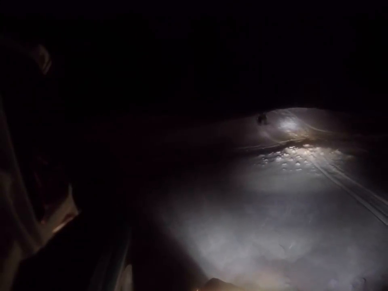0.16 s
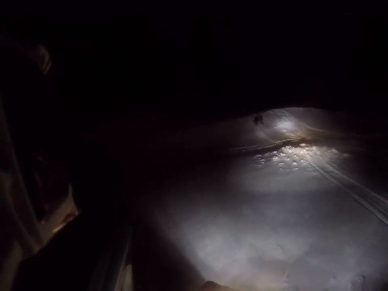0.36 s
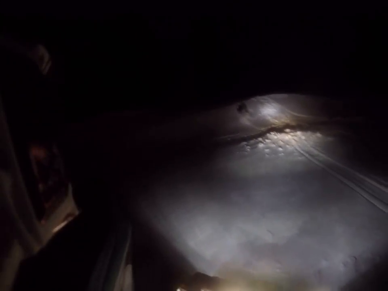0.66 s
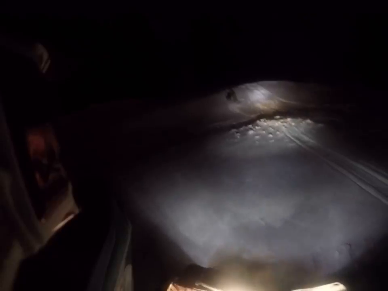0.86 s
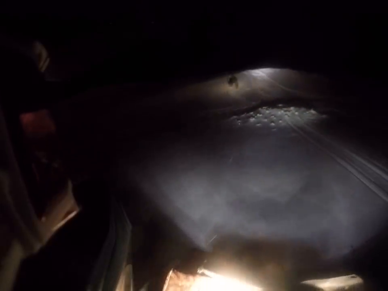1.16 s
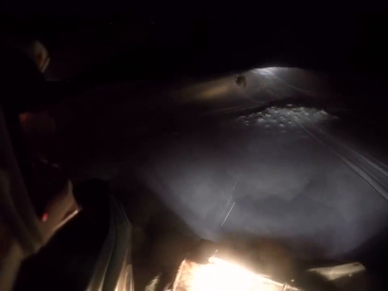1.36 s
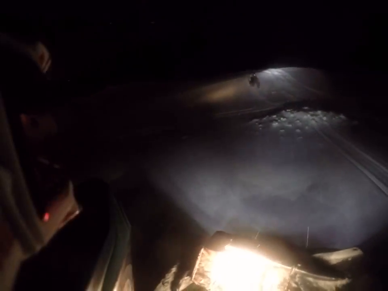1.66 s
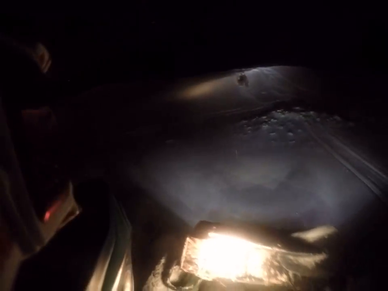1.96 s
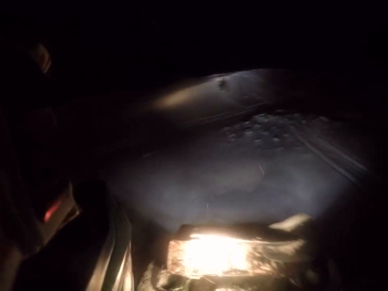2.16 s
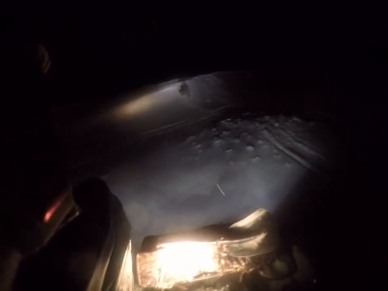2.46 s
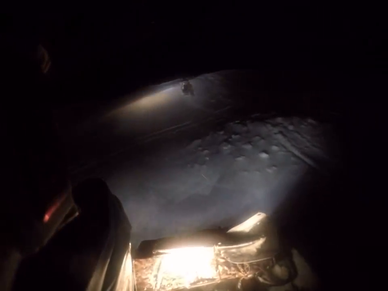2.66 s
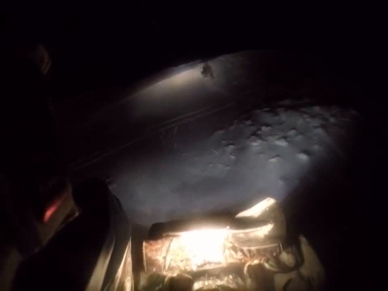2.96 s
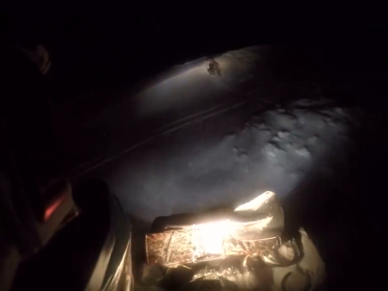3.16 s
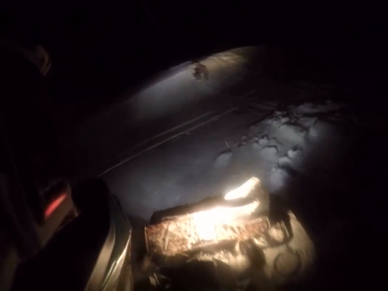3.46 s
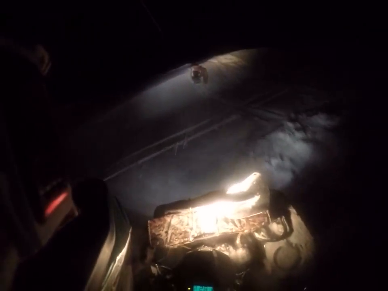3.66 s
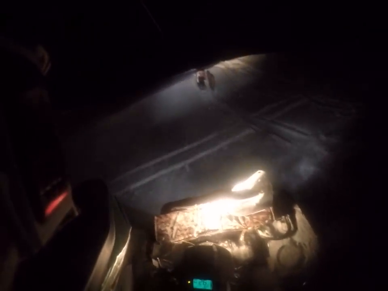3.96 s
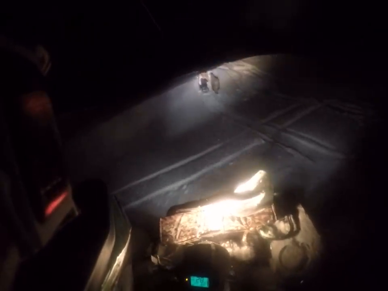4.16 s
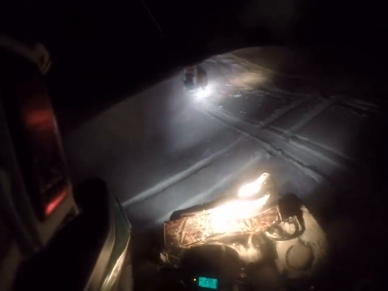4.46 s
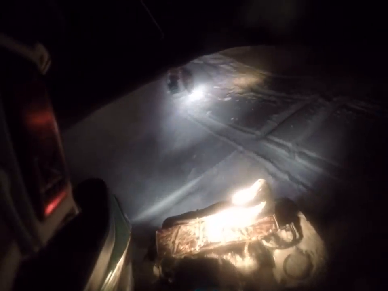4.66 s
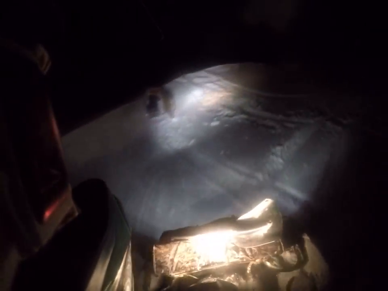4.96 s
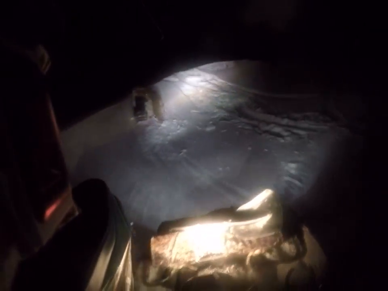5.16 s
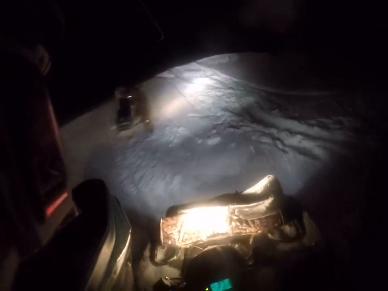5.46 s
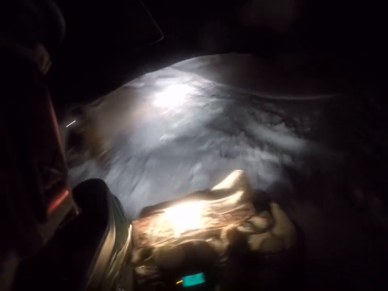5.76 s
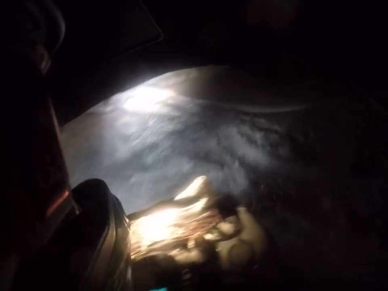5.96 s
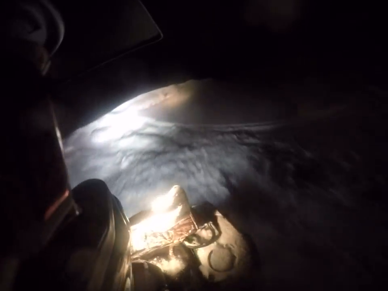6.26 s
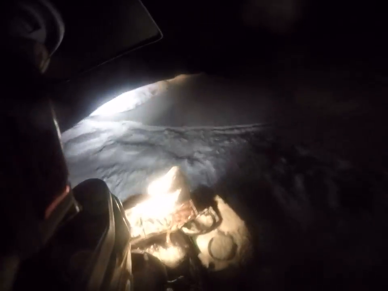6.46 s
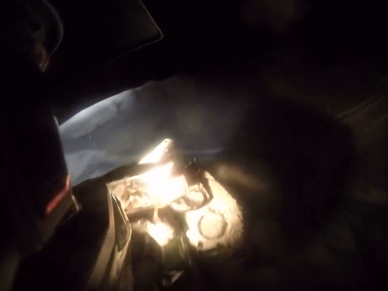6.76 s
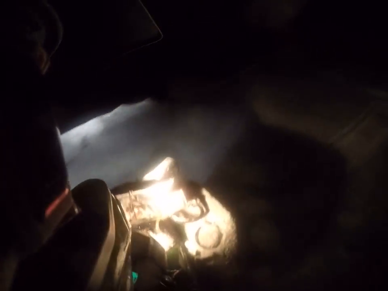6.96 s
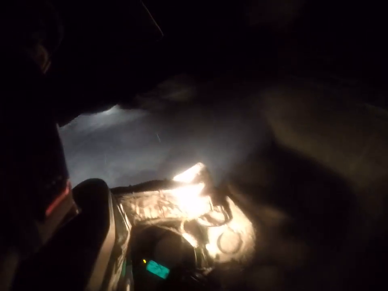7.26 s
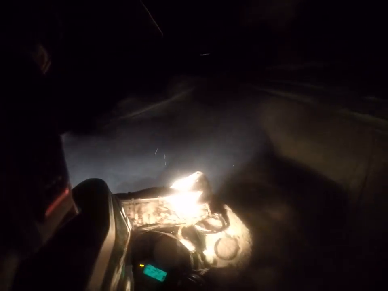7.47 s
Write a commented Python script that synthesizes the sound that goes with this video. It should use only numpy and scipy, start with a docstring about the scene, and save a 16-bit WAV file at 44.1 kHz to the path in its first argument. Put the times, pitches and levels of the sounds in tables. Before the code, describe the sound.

Close from the rider's seat, the thumping engine of a tracked all-terrain vehicle rises from idle in two nudges of throttle. After a sharp click and a very hard, booming knock on the bodywork, it revs higher and keeps pulling across open snow. The chassis rumbles over bumps, gears whine in patches, and light knocks, ice ticks and a faint brushing of snow come through the engine.

```python
"""Tracked all-terrain vehicle pulling away through snow.

Heard from the seat: idle, two nudges of throttle, then a held pull. Each engine cycle thumps the
exhaust, gulps air and rattles the casing. Gears whine, the chassis rumbles, the tracks brush snow
and fling ice. Loose fittings tick, and one hard knock sets the chassis booming."""
import sys
import numpy as np
from scipy import signal
from scipy.fft import rfft, irfft, next_fast_len
from scipy.io import wavfile
from scipy.ndimage import uniform_filter1d

SR = 44100
rng = np.random.default_rng(int(sys.argv[2]) if len(sys.argv) > 2 else 0)


def dump(signal):
    """Clip the signal to [-1, 1] and save it as 16-bit WAV at the path in sys.argv[1]."""
    limited = np.clip(np.atleast_2d(signal).T, -1, 1)
    pcm = np.round(limited * 32767).astype(np.int16)
    wavfile.write(sys.argv[1], SR, pcm)


N = 336042
TIME_S = np.arange(N) / SR

# Engine speed. Each row: time in seconds, cycle rate in Hz.
CYCLE_RATE = [(0, 13.6), (0.42, 14.3), (0.67, 20.8), (0.8, 23), (0.93, 26.7), (1, 28.4), (1.06, 29.3),
              (1.17, 30.1), (1.26, 29.2), (1.41, 24.6), (1.53, 23.2), (1.65, 25.8), (1.82, 29),
              (1.95, 30.3), (2.03, 30.7), (2.38, 30.9), (2.67, 31.5), (2.9, 33.4), (3.03, 36.3),
              (3.14, 39.9), (3.24, 42.6), (3.35, 44.8), (3.42, 44.8), (3.66, 42.7), (3.75, 43),
              (4.04, 45.5), (4.27, 42.7), (4.57, 41.3), (4.87, 47.3), (5.02, 49.5), (5.13, 50.4),
              (5.29, 50), (5.48, 48), (5.94, 46.4), (6.19, 45), (6.34, 45.9), (6.79, 43.7), (7.07, 46.7),
              (7.33, 47.7), (7.62, 46.3)]
# Throttle. Each row: time in seconds, opening from 0 to 1.
THROTTLE = [(0.38, 0.03), (0.45, 0.93), (0.85, .35), (0.95, 1), (1.24, 0.97), (1.35, 0.06), (1.58, 0.66),
            (1.72, 0.8), (2.1, 0.71), (2.8, 0.71), (3, 0.9), (3.22, 0.94), (3.37, 0.8), (3.53, 0.4),
            (3.69, 0.65), (4.05, 0.87), (4.16, 0.38), (4.54, 0.44), (4.66, 0.93), (4.88, 0.99), (5.3, 0.82),
            (5.86, 0.71), (6.27, 0.92), (7.1, 0.91), (7.62, 0.91)]
# Breathing against speed. Each row: cycle rate in Hz, then exhaust, burble and inlet gains in dB.
BREATHING = [(14, -12, -61.5, -76), (21.5, -14, -52, -79), (26, -0.5, -47.5, -63), (30.2, -0.5, -50, -56),
             (33.2, 1.5, -57, -50.5), (41.6, 0, -49, -47), (44.7, 0, -48.5, -58), (51.4, 3, -45, -59)]
# Low-speed exhaust spectrum. Each row: frequency in Hz, relative level of an order there in dB.
EXHAUST_SLOW = [(40, -43), (62, -35.5), (78, -35), (92, -41.5), (125, -45), (155, -48.5), (180, -45.5),
                (215, -51.5), (255, -51), (300, -49), (355, -51.5), (400, -63.5), (650, -64)]
# High-speed exhaust spectrum, silencer peaks near 300 and 450 Hz. Columns as above.
EXHAUST_FAST = [(85, -32), (135, -36), (180, -38.5), (200, -40), (228, -47), (260, -52), (302, -42),
                (322, -45.5), (350, -57), (385, -54.5), (415, -53), (452, -46.5), (490, -57), (600, -59.5),
                (680, -61), (760, -61), (1300, -56)]
# A wider throttle shortens the exhaust pulse. Each row: opening from 0 to 1, first notched order.
PULSE_NOTCH = [(0.7, 3.05), (0.88, 3.7), (0.97, 4.15)]
# Air box resonances. Each row: frequency in Hz, width in Hz.
AIRBOX_MODES = [(795, 66), (990, 33)]
# Air box ringing. Each row: time in seconds, lower mode level in dB, upper mode level in dB.
AIRBOX_LEVELS = [(0.6, -73, -77), (0.95, -56, -67), (1.18, -54, -66), (1.35, -62, -56), (1.5, -70, -71),
                 (1.65, -51, -56), (1.87, -50, -53.5), (2.2, -59, -52), (2.6, -58, -56), (2.95, -53.5, -68),
                 (3.27, -44, -50), (3.6, -54, -55), (3.85, -49.5, -49), (4.4, -50.5, -58),
                 (4.9, -47.5, -58), (5.6, -52.5, -50), (6.1, -50.5, -63), (6.9, -49, -51), (7.3, -60, -51)]
# Inlet hiss. Each row: frequency in Hz, relative level in dB.
INLET_SPECTRUM = [(200, -55), (500, -3.5), (700, -8.5), (1050, 7), (1400, -8.5), (2000, -33), (4000, -44)]
# Casing clatter. Each row: time in seconds, level in dB.
CLATTER_LEVEL = [(0.0, -49.5), (0.59, -50.5), (0.98, -43), (1.38, -42.5), (2.27, -40), (2.47, -44.5),
                 (2.8, -45), (3.3, -36), (3.87, -35.5), (4.07, -33), (4.6, -36.5), (4.9, -31.5),
                 (5.29, -34), (7.32, -32.5), (7.62, -33.5)]
# Broad casing response. Each row: frequency in Hz, relative level in dB.
CASING_SPECTRUM = [(200, -45.5), (420, -5), (650, -11.5), (1200, -9.5), (1700, -2), (2400, -6.5),
                   (3600, -15.5), (6000, -23), (7000, -28), (8600, -30), (9800, -35.5), (12000, -36.5),
                   (15500, -57)]
# Casing resonances. Each row: frequency in Hz, width in Hz, boost in dB.
CASING_MODES = [(1480, 120, 4), (1900, 280, 8.5), (2150, 120, 3), (2930, 400, 6.5), (4560, 330, 4),
                (5450, 320, 4), (6150, 350, 4), (7740, 500, 7.5)]
# Added at low speed, narrowing the casing's ring. Each row: frequency in Hz, width in Hz, gain in dB.
CASING_SLOW = [(1540, 180, -5), (2150, 330, 1.5), (2700, 200, -2)]
# Cam gear whine. Each row: time in seconds, base level in dB.
CAM_LEVEL = [(2.9, -68), (3.02, -44), (3.09, -55), (3.17, -43.5), (3.26, -42), (3.4, -50), (3.7, -48),
             (4.05, -53), (4.27, -43), (4.53, -41), (4.66, -42), (4.85, -34), (4.97, -50), (5.33, -51),
             (5.5, -39), (5.9, -44), (6.2, -40), (6.45, -41), (6.6, -52), (6.87, -54), (7.08, -35),
             (7.3, -34), (7.62, -40)]
# Frame judder as the clutch grabs. Each row: centre in seconds, half length in seconds, level in dB.
JUDDERS = [(0.115, 0.081, -34), (0.738, 0.053, -34), (1.127, 0.23, -27), (1.663, 0.023, -30),
           (2.1, 0.33, -31), (2.787, 0.089, -29), (3.023, 0.12, -22.5)]
# Trail bumps. Each row: centre in seconds, level in dB.
TRAIL_BUMPS = [(3.52, -33), (4.23, -25.5), (4.43, -29), (4.73, -28), (5.049, -30),
               (5.3, -34), (6.17, -33), (6.47, -28.5), (6.88, -40), (7.18, -29)]
# Chassis rumble. Each row: frequency in Hz, relative level in dB.
RUMBLE_SPECTRUM = [(12, -25), (24, -6), (34, 0), (46, -5), (60, -13), (100, -26), (200, -37), (400, -46),
                   (900, -65)]
# Blows on the bodywork. Each row: start in seconds, peak in dB, centre in Hz, spread in octaves,
# rattle gain in dB.
KNOCKS = [(0.658, -38, 1900, 0.36, -29), (0.88, -34, 1890, 0.25, -30), (0.916, -27, 1330, 0.72, -20),
          (1.387, -41, 9500, .4, -42), (1.439, -37, 11000, .5, -42), (1.8885, -4.5, 6000, 0.91, -54),
          (1.9696, -37, 11000, 0.8, -45), (2.3022, -31.5, 11000, 1.2, -39), (2.4461, -1.5, 2010, 0.32, -46),
          (2.448, 0.5, 4200, 1.6, -37), (2.4486, -1, 2100, 1.15, -30), (2.455, -5.5, 4400, 1.5, -39),
          (2.483, -28.5, 2970, 1.4, -26), (3.008, -28, 10100, 1.6, -30), (3.083, -36, 11000, 0.65, -47),
          (3.3796, -31, 10000, 0.92, -36), (3.4273, -15, 3820, 1.6, -41), (4.059, -31, 8000, 0.74, -38),
          (4.1611, -15.5, 3250, 2.3, -38), (4.295, -24, 1790, 0.2, -37), (5.0492, -24.5, 5560, 0.4, -35),
          (5.1356, -40, 12000, .5, -36), (5.439, -22, 1900, 0.71, -29), (5.698, -24, 8900, 1.9, -34),
          (6.2501, -32, 12000, .6, -38), (6.903, -17, 1960, 0.21, -28), (6.975, -33, 13600, .3, -40),
          (6.989, -22.5, 8350, 1.1, -44), (7.04, -32, 10500, 0.89, -36), (7.178, -35, 13000, .5, -26),
          (7.2907, -39, 13000, .4, -36)]
# Bodywork modes. Each row: frequency in Hz, relative level in dB, T60 in seconds.
PANEL_MODES = [(785, 6.5, 0.016), (1270, 3.5, 0.0092), (1485, 4, 0.0165), (1710, 6.5, 0.013),
               (1920, 2, 0.0062), (2620, 6.5, 0.014), (2390, 11.5, 0.0048), (2960, 11, 0.0067),
               (3900, 5, 0.0063), (4510, 5, 0.011), (5280, 6.5, 0.0044), (6230, 1.5, 0.0082),
               (7940, 5.5, 0.0041), (8800, 3, 0.0034), (9570, 0, 0.0052), (10900, -0.5, 0.0049),
               (13750, 7.5, 0.0016)]
# Chassis after the hard knock. Each row: start in seconds, frequency in Hz, level in dB, T60 in seconds.
BOOMS = [(2.445, 39.5, -11, 0.78), (2.451, 64.4, -10.5, 0.1), (2.446, 125, -15, 0.1),
         (2.446, 227, -18, 0.029), (2.447, 350, -11, 0.016), (2.448, 812, -14, 0.04)]
# Slack belt tones. Each row: frequency in Hz, width in Hz, relative level in dB.
BELT_TONES = [(1170, 110, -3), (1465, 61, 1), (3740, 470, -9), (5440, 85, -3.5), (5950, 380, -11.5),
              (7600, 300, -16), (9800, 1500, -24)]
# Track guide scrapes. Each row: centre in seconds, half length in seconds, pitch in Hz,
# glide in Hz per second, level in dB.
GUIDE_SCRAPES = [(4.946, .25, 5460, 49, -59), (5.419, 0.15, 5580, -100, -49.5),
                 (5.796, 0.14, 5660, 99.5, -50.5), (6.43, 0.115, 5380, -1300, -51),
                 (6.829, 0.14, 4600, -200, -52), (7.2, 0.23, 5260, -250, -52)]
# Final drive whine, sinking as the tracks slow. Each row: time in seconds, pitch in Hz.
DRIVE_PITCH = [(4.6, 1465), (5.3, 1412), (6, 1400), (6.6, 1287)]
# Tracks brushing snow. Each row: centre in seconds, half length in seconds, level in dB.
SNOW_BRUSHES = [(1.44, 0.036, -44), (1.506, 0.023, -40), (1.612, 0.031, -41), (1.99, 0.099, -49),
                (2.227, 0.088, -46.5), (4.028, 0.13, -40.5), (4.328, 0.03, -43), (4.912, 0.051, -46),
                (6.22, 0.78, -44.5)]
# Brushed snow. Each row: frequency in Hz, relative level in dB.
SNOW_SPECTRUM = [(800, -25), (2000, -1), (2900, 10), (4200, -6), (6000, -13), (7200, -26), (9500, -18),
                 (11000, -27), (15000, -35)]

ROLL_START_S = 2.87


def engine(start_turns=0.95, inlet_closed_loss_db=8):
    """Exhaust, intake, casing and cam gear follow the crank; the chassis shakes with it."""
    hz, = curves(CYCLE_RATE)
    closed = 1 - np.clip(curves(THROTTLE)[0], 0, 1)
    rate_hz, *gains_db = np.transpose(BREATHING)
    exhaust_db, burble_db, inlet_db = (np.interp(hz, rate_hz, db) for db in gains_db)
    turns = start_turns + np.cumsum(hz * (1 + 0.001 * walk(20))) / SR
    out = undb(exhaust_db) * exhaust(turns, hz, closed)
    out += undb(burble_db) * burble(turns, hz)
    out += intake(turns, hz, inlet_db - inlet_closed_loss_db * closed)
    return out + clatter(turns, hz) + cam_gear(turns, closed) + chassis(turns, hz)


def exhaust(turns, hz, closed, notch_db=-12.5):
    """One pressure pulse a cycle: notched by its length at low speed, silencer-shaped at high speed."""
    fast = np.clip((hz - 37) / 6, 0, 1)
    stagger_turns = 0.0015 * (1 + fast) * walk(45)  # firings come early or late
    notch_order = np.interp(1 - closed, *np.transpose(PULSE_NOTCH))
    out = 0
    for order in range(2, 25):
        order_hz = order * hz
        comb_db = 10 * np.log10(np.sin(np.pi * order / notch_order) ** 2 + undb(notch_db) ** 2)
        slow_db = np.interp(order_hz, *np.transpose(EXHAUST_SLOW)) + comb_db - 8 * closed ** 2
        # a closing throttle softens the note and takes out the bark
        closed_loss_db = 4 + 21.5 * bell(order_hz, centre_hz=173, width_hz=100)
        fast_db = np.interp(order_hz, *np.transpose(EXHAUST_FAST)) - closed * closed_loss_db
        lag_rad = rng.uniform(-1, 1) * min((order - 2) / 5, 1) * (1.5 + 0.5 * fast)
        lead_rad = 0.15 * min(order - 2, 10) ** 2  # the pipe delays low orders: each pulse falls
        waver_db = min(0.3 + 0.12 * order, 2.5) * walk(6)
        gain = undb((1 - fast) * slow_db + fast * fast_db + waver_db)
        out += gain * np.cos(2 * np.pi * order * (turns + stagger_turns) + lead_rad - lag_rad)
    return np.sqrt(2) * out * undb(0.92 * walk(18))


def burble(turns, hz):
    """Ragged gas flow: separate chugs at idle, merging with speed."""
    depth = np.interp(hz, [20, 42], [0.95, 0.5])
    puffs = (1 + depth * np.cos(2 * np.pi * (turns + 0.1))) ** 1.5
    return unit(colour(noise() * puffs, [(40, -23), (90, 11), (300, 9), (450, -11.5), (900, -32)]))


def intake(turns, hz, inlet_db):
    """One gulp a cycle rings the air box and sounds from the open inlet; breathier at speed."""
    gulps = steady(strikes(turns, 0.6, size=1, scatter_db=1, jitter_ms=0.04))
    air = gulps + np.interp(hz, [32, 44], [0.12, 0.9]) * noise()
    rings = sum(undb(db) * steady(resonate(air, [(centre_hz, width_hz, 0)]))
                for (centre_hz, width_hz), db in zip(AIRBOX_MODES, curves(AIRBOX_LEVELS)))
    return rings + undb(inlet_db) * unit(colour(air, INLET_SPECTRUM))


def clatter(turns, hz, parts=20, decay_s=0.0031):
    """Valves, piston and chain tap the casing, over a hiss that pulses with the crank."""
    offsets_turns = (np.arange(parts) + rng.random(parts)) / parts
    sizes = rng.choice([-1, 1], parts) * undb(1.65 * rng.standard_normal(parts))
    t = TIME_S[:SR // 50]
    taps = 0
    for offset_turns, size in zip(offsets_turns, sizes):
        ring = rng.standard_normal(len(t)) * np.exp(-t / decay_s)
        hits = strikes(turns, offset_turns, size, scatter_db=2, jitter_ms=0.055)
        taps += signal.oaconvolve(hits, ring)[:N]
    hiss = noise() * (1 + 0.079 * np.cos(2 * np.pi * turns)) * undb(walk(25))
    force = steady(taps) + undb(-2.5) * hiss
    fast_ring = unit(colour(force, CASING_SPECTRUM, CASING_MODES))
    slow_ring = unit(colour(force, CASING_SPECTRUM, CASING_MODES + CASING_SLOW))
    fast = np.clip((hz - 30) / 12, 0, 1)
    level_db, = curves(CLATTER_LEVEL)
    return undb(level_db) * (fast * fast_ring + (1 - fast) * slow_ring)


def cam_gear(turns, closed, teeth=40, rasp_db=-46):
    """Loaded teeth whine in patches and rasp; valve springs load them once a cycle, adding sidebands."""
    level_db = curves(CAM_LEVEL)[0] + 2.2 * walk(14)
    tone = undb(level_db) * whine(teeth * turns, waver_rad=0.45 + 0.15 * closed)
    tone *= ramp(CAM_LEVEL[0][0], length_s=0.05)
    rasp = undb(rasp_db) * whine(teeth * turns, waver_rad=1) * walk(170)
    rasp *= ramp(ROLL_START_S, length_s=1.7)
    return (tone + rasp) * (1 + 0.55 * np.cos(2 * np.pi * turns))


def chassis(turns, hz, idle_db=-53, rolling_db=-33):
    """Orders near resonance rock the frame, hardest as the clutch grabs; then track jolts take over."""
    judder = sum(undb(db) * swell(s, half_s) for s, half_s, db in JUDDERS)
    bumps = sum(undb(db) * swell(s, half_s=0.041) for s, db in TRAIL_BUMPS)
    smooth_trail_db = -4.5 * swell(5.86, half_s=0.25)
    rolling = undb(rolling_db + smooth_trail_db) * ramp(ROLL_START_S, length_s=0.27)
    orders = np.arange(1, 4)[:, None]
    response = bell(orders * hz, centre_hz=35.65, width_hz=6)
    rocking = steady((response * np.sin(2 * np.pi * orders * turns)).sum(axis=0))
    jolts = steady(colour(noise(), RUMBLE_SPECTRUM))
    jolt_gain = np.hypot(rolling, bumps + undb(-9) * judder)
    return (undb(idle_db) + judder) * rocking + jolt_gain * jolts


def knocks(rattle_decay_s=0.01):
    """Blows ring the bodywork and rattle loose fittings; harder contacts reach higher modes."""
    out, t = np.zeros(N), TIME_S[:SR // 10]
    hz, mode_db, t60_s = np.transpose(PANEL_MODES)
    sign = (-1) ** np.arange(len(hz))  # neighbouring modes swing opposite ways
    decay = undb(-60 * t / t60_s[:, None])
    for start_s, peak_db, centre_hz, spread_oct, rattle_db in KNOCKS:
        reach = undb(mode_db) / (1 + (np.log2(hz / centre_hz) / spread_oct) ** 2)
        detuned_hz = hz * (1 + 0.048 * rng.standard_normal(len(hz)))
        ring = (sign * reach) @ (decay * np.sin(2 * np.pi * np.outer(detuned_hz, t)))
        rattle = rng.standard_normal(len(t)) * np.exp(-t / rattle_decay_s)
        ring += undb(rattle_db) * signal.fftconvolve(ring, rattle)[:len(t)]
        add(out, start_s, undb(peak_db) * ring / np.abs(ring).max())
    return out


def boom():
    """Chassis modes ring down after the hard knock."""
    out, t = np.zeros(N), TIME_S[:SR]
    for start_s, hz, db, t60_s in BOOMS:
        add(out, start_s, -undb(db - 60 * t / t60_s) * np.sin(2 * np.pi * hz * t))
    return out


def belt(level_db=-56, grip_s=0.27, fade_db_per_s=34):
    """The slack belt sings at idle and fades as it grips."""
    fade_db = fade_db_per_s * np.maximum(TIME_S - grip_s, 0)
    return undb(level_db - fade_db) * unit(resonate(noise(), BELT_TONES))


def bearing(hz=2800, level_db=-59.5):
    """A dry bearing sings briefly around idle."""
    return undb(level_db) * swell(0.26, half_s=0.41) * whine(hz * TIME_S, waver_rad=2)


def track_guides():
    """The guides scrape in thin, gliding bands."""
    flutter, wander_hz = walk(380), 45 * walk(200)
    out = 0
    for s, half_s, centre_hz, glide_hz_per_s, db in GUIDE_SCRAPES:
        hz = centre_hz + glide_hz_per_s * np.clip(TIME_S - s, -3 * half_s, 3 * half_s)
        tone = np.sin(2 * np.pi * np.cumsum(hz + wander_hz) / SR)
        out += undb(db) * swell(s, half_s) * unit(flutter * tone)
    return out


def final_drive(level_db=-49, fade_s=0.033):
    """The final drive gears whine under load."""
    hz, = curves(DRIVE_PITCH)
    loaded = ramp(DRIVE_PITCH[0][0], fade_s) - ramp(DRIVE_PITCH[-1][0] - fade_s, fade_s)
    return undb(level_db) * loaded * whine(np.cumsum(hz) / SR, waver_rad=0.74)


def snow():
    """Swells of fine grains as the tracks brush through snow."""
    brushing = sum(undb(db) * swell(s, half_s) for s, half_s, db in SNOW_BRUSHES)
    grains = noise() * undb(2.1 * walk(400))
    return brushing * unit(colour(grains, SNOW_SPECTRUM))


def ice_crumbs(count=110, span_s=(3.1, 7.55)):
    """Ice flung by the tracks ticks on the bodywork."""
    when, softness = rng.random((count, 2)).T
    at_s = np.interp(when, [0, 1], span_s)
    hits = np.bincount((at_s * SR).astype(int), undb(-29.5 - 10 * np.sqrt(softness)), N)
    spectrum = [(500, -25), (2000, 29), (5000, 4), (7000, -9), (8000, 11), (11000, -0.5), (15000, -10)]
    return colour(hits, spectrum)


def whine(phase_turns, waver_rad):
    """Tone fluttering with the load, rms 1."""
    flutter_db = 1.5 * walk(22)
    return unit(undb(flutter_db) * np.sin(2 * np.pi * phase_turns + waver_rad * walk(40)))


def strikes(turns, offset_turns, size, scatter_db, jitter_ms):
    """One impulse per engine cycle, scattered in time and size."""
    due_turns = np.arange(400) + offset_turns
    at_s = np.interp(due_turns, turns, TIME_S) + jitter_ms / 1000 * rng.standard_normal(len(due_turns))
    sizes = size * undb(scatter_db * rng.standard_normal(len(due_turns)))
    keep = (due_turns < turns[-1]) & (at_s > 0)
    return np.bincount((at_s[keep] * SR).astype(int), sizes[keep], N)[:N]


def colour(x, spectrum, modes=()):
    """Minimum-phase filter from (Hz, dB) points and (Hz, width Hz, dB) modes."""
    size = next_fast_len(N + SR // 2, real=True)
    bins_hz = np.fft.rfftfreq(size, 1 / SR) + 1
    hz, db = np.transpose(spectrum)
    gain_db = np.interp(np.log(bins_hz), np.log(hz), db)
    for centre_hz, width_hz, boost_db in modes:
        gain_db += boost_db * bell(bins_hz, centre_hz, width_hz)
    cepstrum = irfft(np.log(undb(gain_db)), size)
    cepstrum[1:size // 2] *= 2
    cepstrum[size // 2 + 1:] = 0
    return irfft(rfft(x, size) * np.exp(rfft(cepstrum)), size)[:N]


def resonate(x, modes):
    """Steep parallel resonances from (Hz, width Hz, dB) rows."""
    out = 0
    for hz, width_hz, db in modes:
        b, a = signal.iirpeak(hz, hz / (1.5 * width_hz), SR)
        out += undb(db) * signal.lfilter(b, a, signal.lfilter(b, a, x))
    return out


def bell(hz, centre_hz, width_hz):
    """Resonance curve, peak 1."""
    return 1 / (1 + (2 * (hz - centre_hz) / width_hz) ** 2)


def swell(centre_s, half_s):
    """Gaussian rise and fall."""
    return np.exp(-0.5 * ((TIME_S - centre_s) / half_s) ** 2)


def ramp(start_s, length_s):
    """Linear rise from 0 to 1."""
    return np.clip((TIME_S - start_s) / length_s, 0, 1)


def curves(table):
    """Value columns of a time table, per sample."""
    s, *columns = np.transpose(table)
    return [np.interp(TIME_S, s, column) for column in columns]


def walk(rate_hz):
    """Random wander, rms 1."""
    points = rng.standard_normal(4096)
    return unit(np.interp(TIME_S * rate_hz, np.arange(len(points)), points))


def noise():
    """White noise."""
    return rng.standard_normal(N)


def undb(db):
    """Decibels to gain."""
    return 10 ** (np.asarray(db) / 20)


def unit(x):
    """Scale to rms 1."""
    return x / np.sqrt(np.mean(x ** 2))


def steady(x):
    """Hold the running rms at 1."""
    return x / np.sqrt(uniform_filter1d(x ** 2, size=SR // 3) + 1e-18)


def add(out, start_s, sound):
    """Mix a sound in at start_s."""
    i = int(start_s * SR)
    out[i:i + len(sound)] += sound[:N - i]


def scene(hiss_db=-73):
    """Mono, all close to the rider, no echo over open snow; faint even hiss underneath."""
    machine = engine() + belt() + bearing() + track_guides() + final_drive()
    trail = snow() + ice_crumbs() + knocks() + boom()
    return (machine + trail + undb(hiss_db) * noise())[None]


def record(dry, cutoff_hz=15600):
    """The hardest knock overloads at full scale; a steep low-pass cuts the top."""
    lowpass = signal.ellip(10, 0.2, 80, cutoff_hz, fs=SR, output="sos")
    return signal.sosfilt(lowpass, np.clip(dry, -1, 1))


dry = scene()
out = record(dry)
dump(out)
```